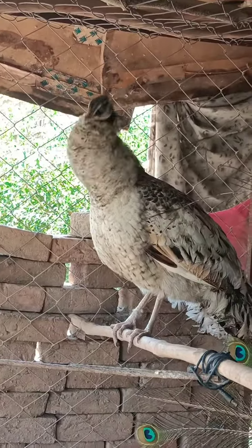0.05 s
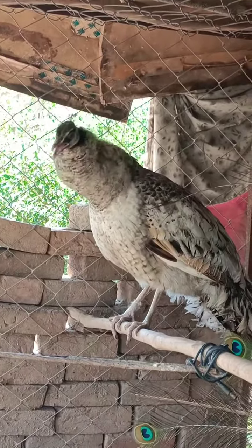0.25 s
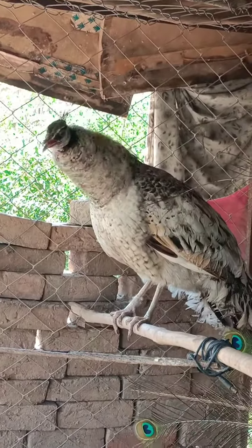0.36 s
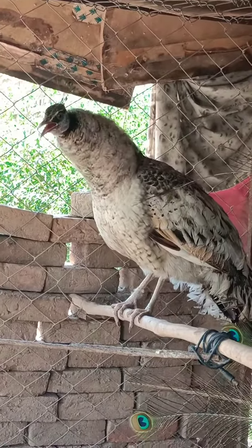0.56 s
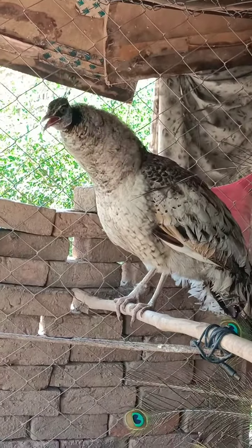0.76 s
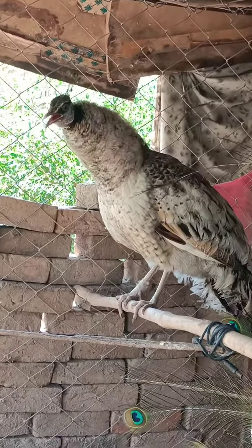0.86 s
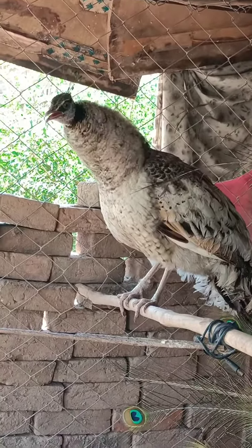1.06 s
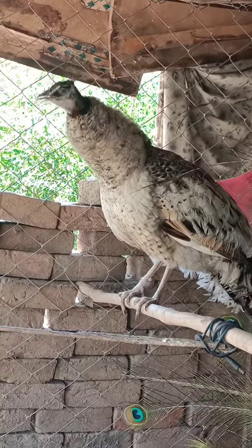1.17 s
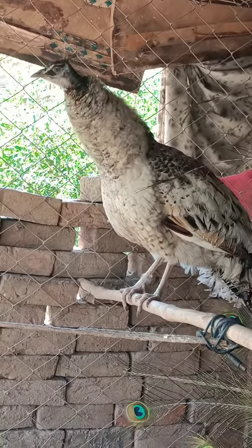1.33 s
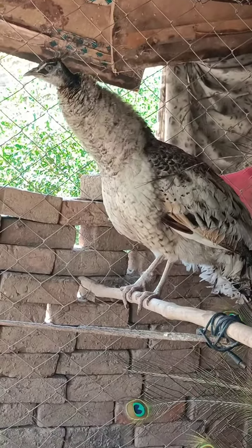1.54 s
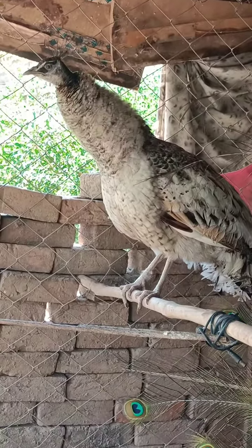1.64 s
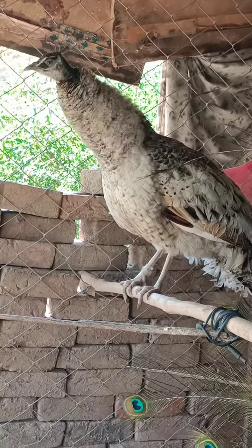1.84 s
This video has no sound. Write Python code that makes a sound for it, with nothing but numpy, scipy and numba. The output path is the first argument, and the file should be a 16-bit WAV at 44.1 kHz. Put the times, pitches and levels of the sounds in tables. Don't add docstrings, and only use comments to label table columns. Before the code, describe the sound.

A peafowl close to the microphone calls once, a short hoarse honk breaking upward into a nasal wail that sags and frays; low distant traffic rumbles throughout, with a very faint far horn at the end.

```python
import sys
import numpy as np
from scipy import signal
from scipy.fft import rfft, irfft
from scipy.io import wavfile
from scipy.ndimage import uniform_filter1d, map_coordinates
from numba import njit

SR = 44100
rng = np.random.default_rng(int(sys.argv[2]) if len(sys.argv) > 2 else 0)


def gain_from_db(level_db):
    decades = np.asarray(level_db, float) / 20
    return 10 ** decades


def wav_record(signal):
    frames = np.transpose(np.atleast_2d(signal))
    bounded = np.clip(frames, -1, 1)
    quanta = np.round(bounded * 32767).astype(np.int16)
    wavfile.write(sys.argv[1], SR, quanta)


N = 83790
t = np.arange(N) / SR

# frequency in Hz, level in dB per Hz.
TRAFFIC_SPECTRUM = [(15, -51), (25, -28), (123, 0.5), (177, -9), (279, -12), (364, -21), (576, -20),
                    (3120, -29), (8000, -69.5), (10400, -89.5), (17600, -120)]
# frequency in Hz, likeness from 0 to 1.
COHERENCE = [(60, 0.73), (120, 1), (300, 0.91), (500, 1), (1000, 0), (2000, 0), (4000, .01)]
# time in seconds, gain in dB.
LORRY = [(0, 4), (.15, 5.5), (.25, 2), (1.9, 1)]
# time in seconds, gain in dB.
BREEZE = [(0, 19.5), (.2, 6.5), (1.3, 11), (1.5, 11), (1.62, 14.5), (1.75, 13.5), (1.9, 5)]
# time in seconds, pitch in Hz, level in dB, roughness from 0 to 1,
# half-rate share from 0 to 1, moving resonance in Hz, its level in dB, beak opening in dB.
HONK_COURSE = [
    (.2045, 196.1, -33, 0.88, 0, 3610, 7, 14),
    (.218, 205.1, -26, 0.68, 0, 3070, -6.5, 7),
    (.256, 212.5, -24, .55, 0.11, 3070, 4.5, 6),
    (.282, 230.2, -21.5, 0.33, 0.15, 3000, 0, 0.5),
    (.3, 231.7, -21.5, 0.05, 0, 2900, 5.5, -1.5),
    (.33, 229.9, -23, 0.14, .01, 2950, 5.5, -0.5),
    (.345, 224.9, -21, 0.45, 0.2, 2820, 5.5, -2.5),
    (.365, 216.4, -28.5, 0, 0.08, 2494, 15, -0.5),
    (.385, 234.3, -51.5, 0.8, 0.3, 2044, 21.5, -4.5),
]
WAIL_COURSE = [
    (.365, 520, -18.5, 0.96, 0.46, 1566, 3.5, 0),
    (.378, 530, -17.5, 0.28, 0.32, 1380, 0, 2.5),
    (.402, 519.7, -19, 0.15, 0.78, 1310, -3, -3.5),
    (.436, 529.4, -14.5, 0.029, 0.12, 1370, 4.5, 1),
    (.465, 537, -16.5, 0.017, 0.02, 1525, 12, 4),
    (.56, 528.2, -15.5, 0.079, 0.019, 1516, -1, 1),
    (.585, 512.2, -17, 0.46, 0.3, 1366, 1.5, -2),
    (.645, 489, -23.5, 0.43, 0.44, 1400, 2, -7),
    (.705, 479.5, -26.5, 0.55, 0.21, 1403, 0, -7),
    (.725, 479, -50, 0.58, 0.21, 1360, -23.5, -12),
]
# centre in Hz, width in Hz, level in dB,
# share of the beak opening (ratio), left over right in dB.
HONK_RESONANCES = [(225, 120, 3, -.5, 2), (640, 220, 0, .1, 0), (1130, 280, -2, 1, 2),
                   (1570, 300, 0, .8, 2), (2080, 200, -4, -.3, 0), (3600, 500, -8, .3, 0),
                   (4550, 400, -3, .1, -2), (5600, 700, -11, -.6, 0), (7200, 1400, -19, .3, -3),
                   (12300, 2500, -31, .1, 0), (410, 120, -12, .8, 0), (850, 120, -12, 1.2, 0)]
WAIL_RESONANCES = [(520, 158, -6.5, 0.11, 4.5), (1055, 97, 1.5, -0.61, -24.5), (264, 66, -7, 0.11, 2.5),
                   (2095, 83, -21, -0.67, 3), (3302, 253, -14.5, 1.3, -11.5), (3770, 810, -22.5, 2.9, -5.5),
                   (5830, 1040, -31, 0.15, -4.5), (6520, 1200, -34.5, 1, -12), (13400, 2500, -48, .2, 0)]
# delay in ms, left level in dB, right level in dB.
REFLECTIONS = [(2.3, -38, -14.5), (4.1, -38.5, -33.5), (7.7, -19.5, -11)]
# multiple of the fundamental (number), level in dB.
HORN_PARTIALS = [(3, -60), (4, -47.5), (6, -59), (7, -62)]
# frequency in Hz, left over right in dB.
PORT_BALANCE = [(60, 1.5), (250, -1.5), (520, 3), (900, -2.5), (1500, -11), (2600, -17), (4400, -22),
                (6800, -24), (9000, -8)]
# frequency in Hz, gain in dB.
MIC_RESPONSE = [(25, -0.5), (7400, -0.5), (8300, -9), (9000, -15), (10200, -23), (11200, -15.5),
                (13000, -15), (15500, -13.5)]

JITTER, SHIMMER_DB, RASP_DB = 0.0432, 3.5, -1.5
SCATTER_RAD, WAVER_DB = 0.95, 3
TREMOR_HZ, TREMOR_DB, TREMOR_START_S = 36, 3.5, 0.49


def level(x, db):
    return x * gain_from_db(db) / np.sqrt(np.mean(x ** 2))


def on_log(hz, table):
    table = np.array(table)
    return np.interp(np.log(hz + 1e-3), np.log(table[:, 0]), table[:, 1])


def over_time(table):
    return np.interp(t, *np.array(table).T)


@njit
def svf(x, hz, width):
    y, band, low = np.empty(len(x)), 0., 0.
    for i in range(len(x)):
        g, k = np.tan(np.pi * hz[i] / SR), width / hz[i]
        v = (band + g * (x[i] - low)) / (1 + g * (g + k))
        band, low, y[i] = 2 * v - band, low + 2 * g * v, k * v
    return y


def ring(x, hz, width):
    hz = hz + np.zeros(len(x))
    once = svf(x, hz, 1.72 * width)
    return svf(once, hz, 1.72 * width)


def walk(rate):
    k = int(SR / rate)
    held = np.repeat(rng.standard_normal(N // k + 1), k)
    return 1.478 * uniform_filter1d(uniform_filter1d(held, k), k)[:N]


def traffic():
    out, swell = 0, walk(1.0)
    lorry, breeze = over_time(LORRY), over_time(BREEZE)
    for hz in 28 * 2 ** np.arange(0, 9.1, .33):
        mid, side = (ring(rng.standard_normal(N + SR // 2), hz, hz / 4)[-N:] for _ in range(2))
        like = np.clip(on_log(hz, COHERENCE), 0, 1)
        db = on_log(hz, TRAFFIC_SPECTRUM) + 0.5 * swell + 0.31 * walk(9.14)
        db = db + lorry * (hz < 300) + breeze * (hz < 60)
        pair = np.sqrt(1 + like) * mid + np.sqrt(1 - like) * side * np.array([[1], [-1]])
        out = out + gain_from_db(db) * pair
    return level(out, -35)


def syrinx_pulses(hz, top_hz, rough, half, phase, even_db):
    k = np.arange(1, int(2 * 15000 / top_hz))[:, None]
    scatter = SCATTER_RAD * rng.standard_normal(k.shape)
    steps = np.repeat(rng.standard_normal((len(k), len(hz) // 600 + 1)), 600, axis=1)[:, :len(hz)]
    waver = gain_from_db(WAVER_DB * k * top_hz / 2 / 5000 * uniform_filter1d(steps, size=600))
    size = np.where(k % 2, half, 1)
    size = size * np.where(k % 4, 1, gain_from_db(even_db * (1 - rough)))
    return (np.cos(k * phase - scatter) * size * waver).sum(axis=0)


def breath_rasp(hz, phase):
    puffs = np.sqrt(SR / hz / 4) * (1 + .8 * np.cos(2 * phase)) * rng.standard_normal(len(hz))
    return signal.sosfilt(signal.butter(2, 870, 'high', fs=SR, output='sos'), puffs)


def note(course, resonances, moving_width, moving_left_db, even_db, flutter_db, lag_ms, growl):
    course = np.array(course)
    hz, db, rough, half, mouth_hz, mouth_db, beak_db = (
        np.interp(t, course[:, 0], column) for column in course.T[1:])
    on = np.flatnonzero((t >= course[0, 0]) & (t < course[-1, 0]))
    phase = np.pi * np.cumsum((hz * (1 + JITTER * rough * walk(250)))[on]) / SR
    pulses = syrinx_pulses(hz[on], hz.max(), rough[on], half[on], phase, even_db)
    rasp = rough[on] * gain_from_db(RASP_DB) * breath_rasp(hz[on], phase)
    voice = np.sqrt(1 - np.clip(rough[on], 0, .95) ** 2) * pulses + rasp
    x = np.full(N, 1e-18)
    x[on] = voice * (1 + growl * rough[on] * np.cos(phase / 2))
    x = x * gain_from_db(db + SHIMMER_DB * rough * walk(119.17))

    def pan(left_db):
        return gain_from_db([[left_db], [0]])

    rings = []
    for j, (centre, width, gain_db, share, left_db) in enumerate(resonances):
        gain = (-1) ** j * gain_from_db(gain_db + share * beak_db)
        rings.append(gain * pan(left_db) * ring(x, centre, 1. * width))
    flutter = (t > TREMOR_START_S) * np.cos(2 * np.pi * TREMOR_HZ * (t - .552))
    rings[1] = rings[1] * gain_from_db(-flutter_db * (0.12 * mouth_db + flutter))
    rings[5] = rings[5] * gain_from_db(flutter_db * flutter)
    moving = pan(moving_left_db) * ring(x * gain_from_db(mouth_db), mouth_hz, moving_width)
    left, right = sum(rings) + moving
    return np.array([np.roll(left, int(lag_ms * SR / 1000)), right])


def honk():
    return note(HONK_COURSE, HONK_RESONANCES, 350., moving_left_db=1.5, even_db=-11,
                flutter_db=0, lag_ms=.07, growl=0.22)


def shelter(pair):
    out, x = pair, pair.mean(axis=0)
    for ms, *dbs in REFLECTIONS:
        echo = map_coordinates(x, [np.arange(N) - ms * SR / 1000], order=1)
        out = out + gain_from_db(dbs)[:, None] * echo
    u, t60_s = t[:SR // 2], 0.51
    tail = rng.standard_normal((2, len(u))) * gain_from_db(-60 * u / t60_s) * (u > .01)
    tail = level(tail, 0) / np.sqrt(len(u))
    return out + gain_from_db(-18.5) * signal.fftconvolve(x[None], tail, axes=1)[:, :N]


def wail():
    return note(WAIL_COURSE, WAIL_RESONANCES, 177.0, moving_left_db=8.5, even_db=0.84,
                flutter_db=TREMOR_DB, lag_ms=-.11, growl=0.54)


def horn():
    pitch_hz, start_s = 427, 1.67
    phase = 2 * np.pi * np.cumsum(pitch_hz * (1 + .002 * walk(15))) / SR
    tone = sum(gain_from_db(db + 5.6 * walk(6.7)) * np.sin(k * phase) for k, db in HORN_PARTIALS)
    return tone * np.clip((t - start_s) / 0.2, 0, 1)


def scene():
    call = honk() + wail()
    return shelter(call) + traffic() + horn()


def top_cut(x):
    return signal.sosfilt(signal.butter(12, 15480, fs=SR, output="sos"), x)


def record(dry):
    hz = np.arange(N // 2 + 1) * SR / N
    tilt = gain_from_db(on_log(hz, PORT_BALANCE))
    balance = np.array([2 * tilt, 2 + 0 * tilt]) / (1 + tilt)
    ports = irfft(rfft(dry) * balance, N)
    x = irfft(rfft(np.tanh(ports)) * gain_from_db(on_log(hz, MIC_RESPONSE)), N)
    hiss = np.array([ring(v, 12300, 6000.) for v in rng.standard_normal((2, N))])
    return top_cut(x + level(hiss, -83))


dry = scene()
out = record(dry)
wav_record(out)
```